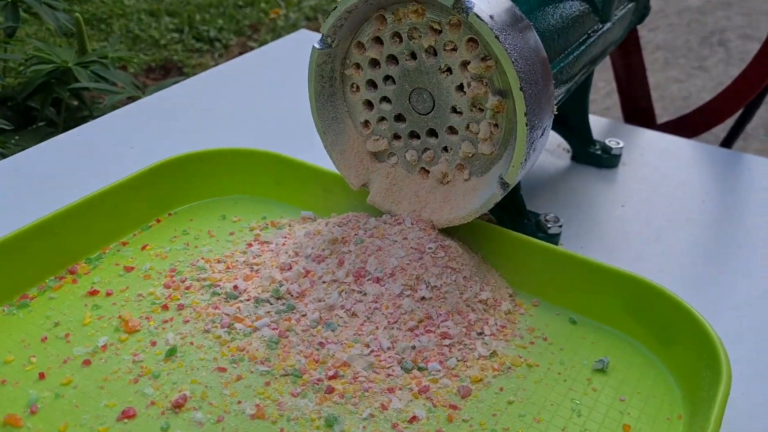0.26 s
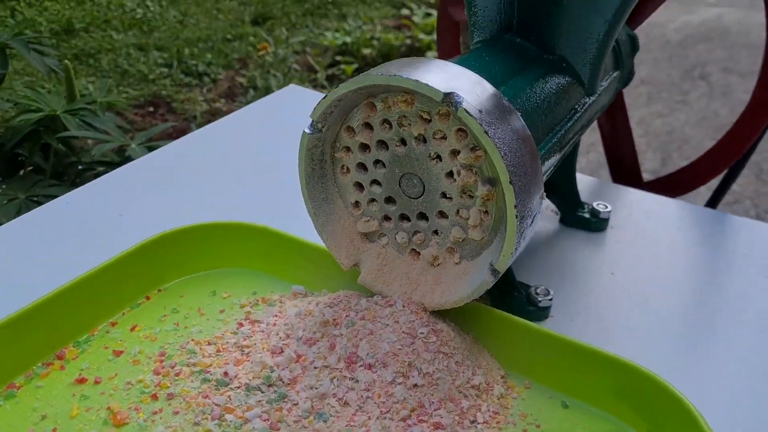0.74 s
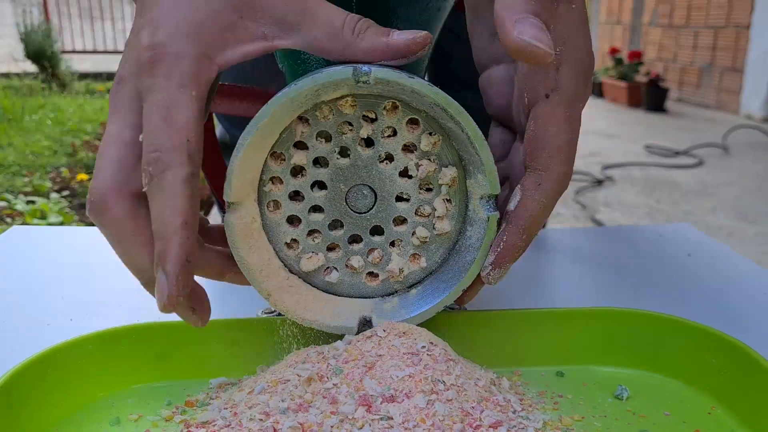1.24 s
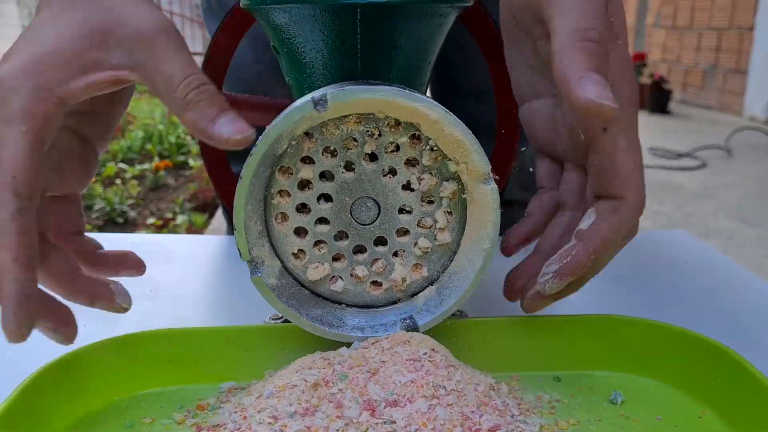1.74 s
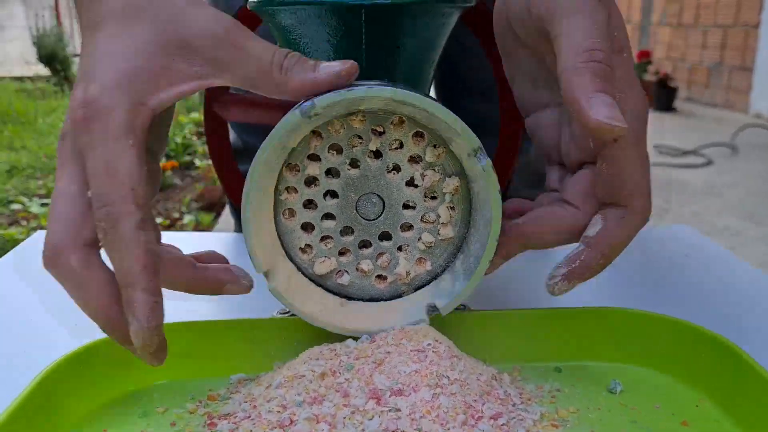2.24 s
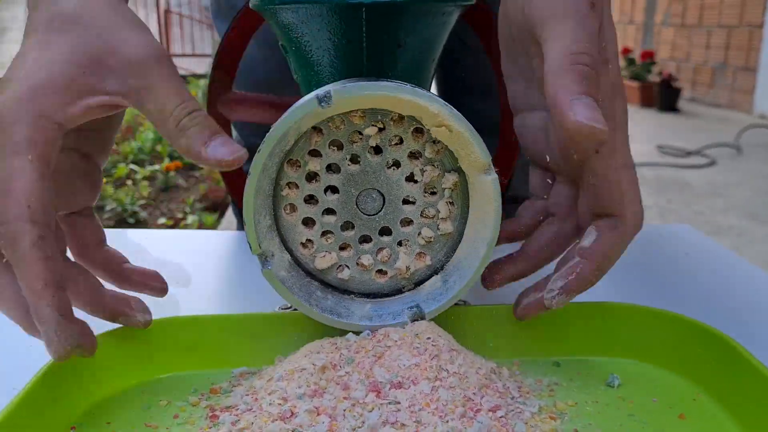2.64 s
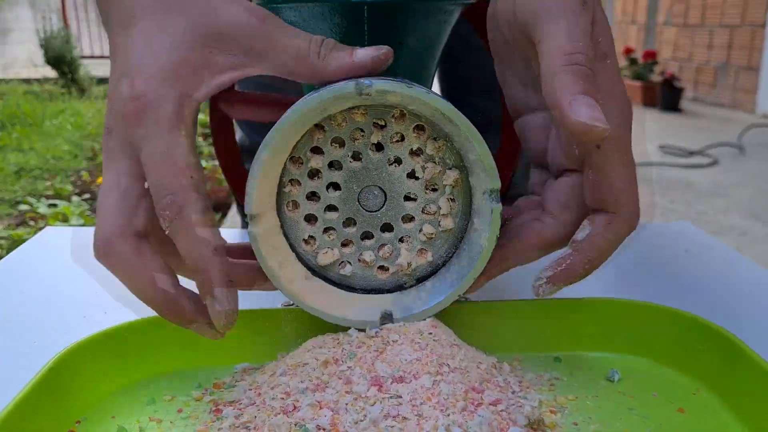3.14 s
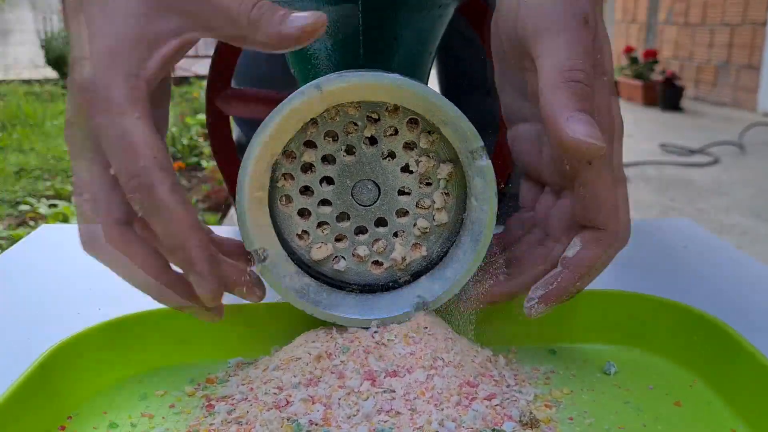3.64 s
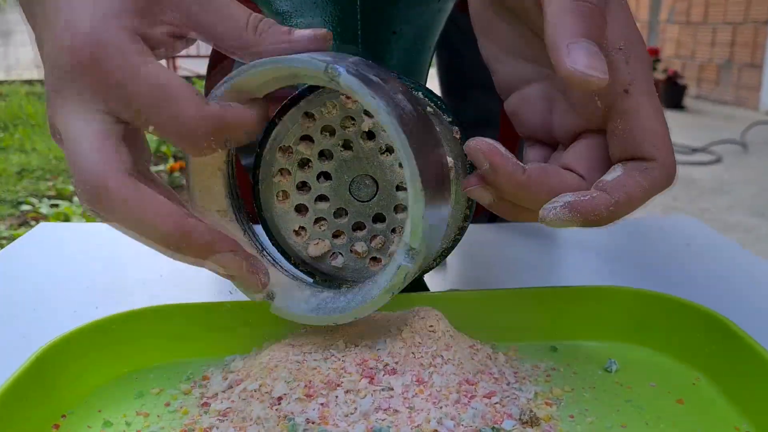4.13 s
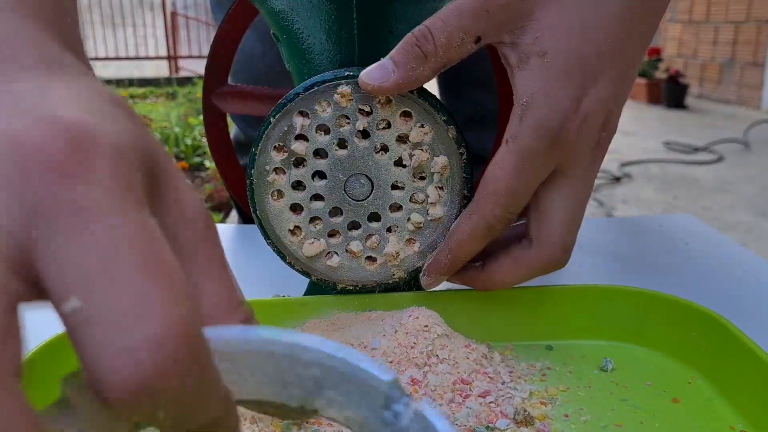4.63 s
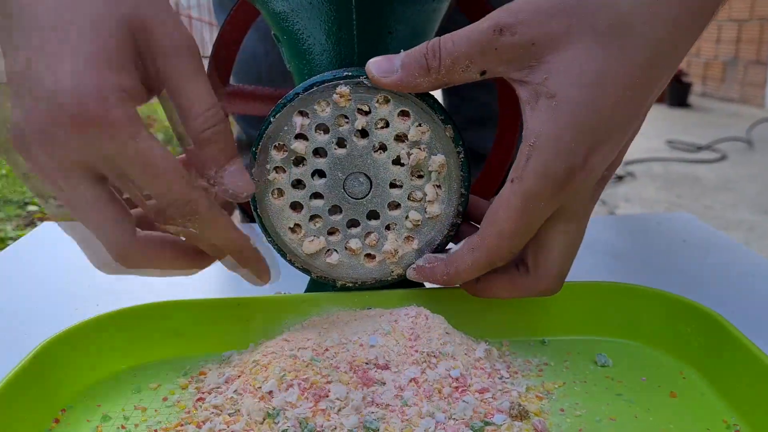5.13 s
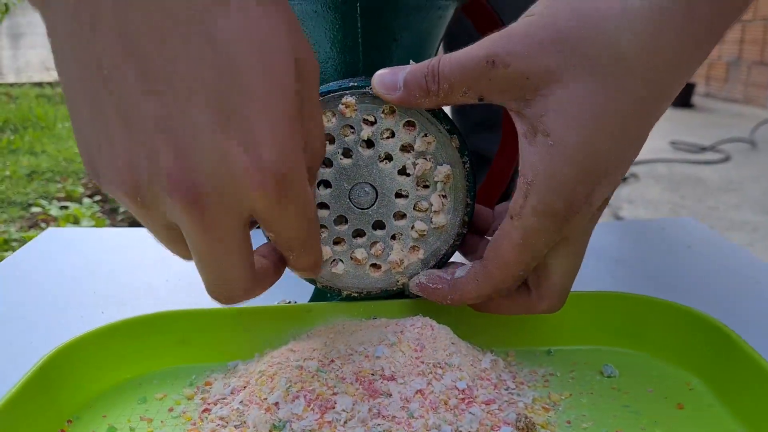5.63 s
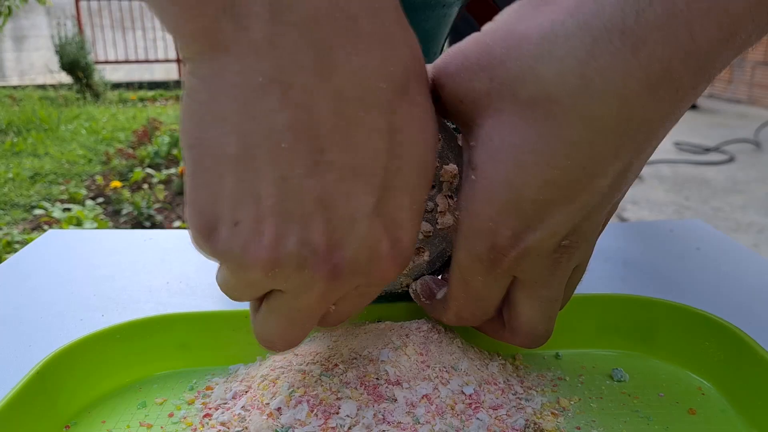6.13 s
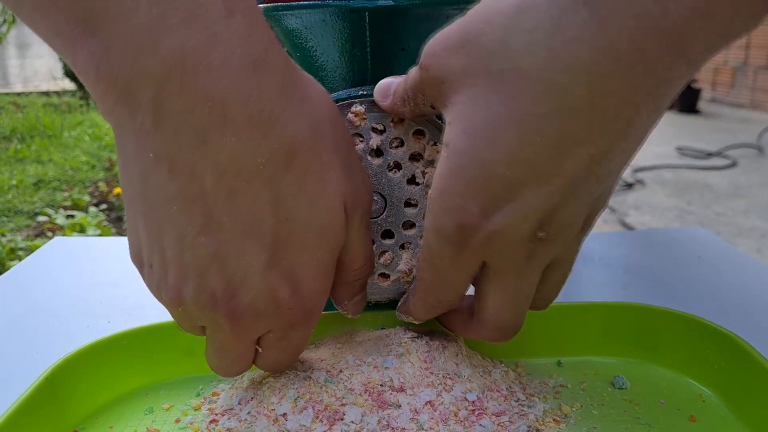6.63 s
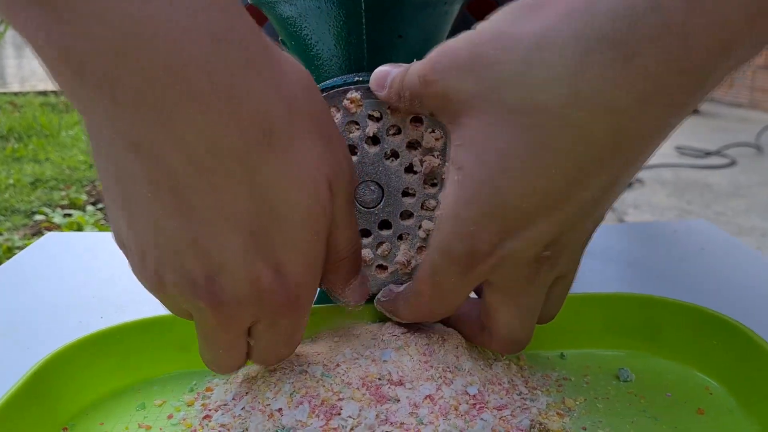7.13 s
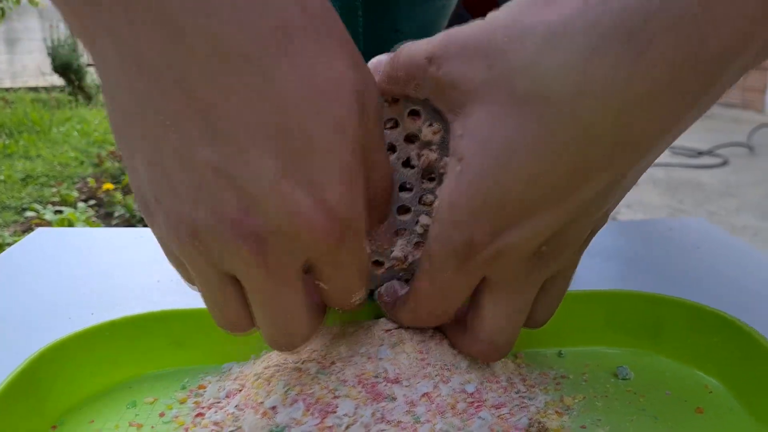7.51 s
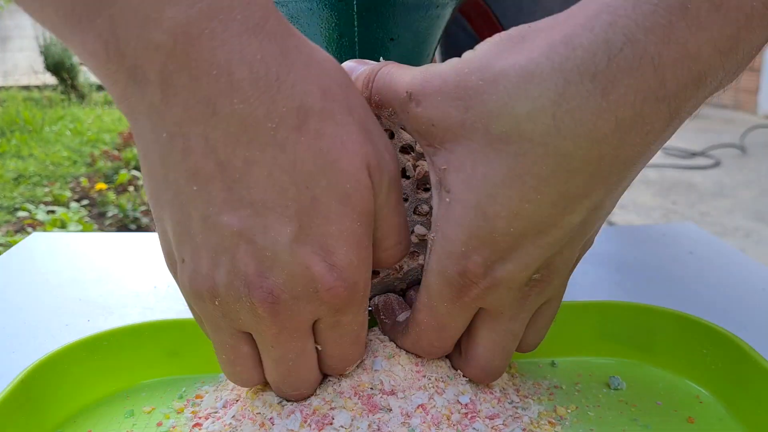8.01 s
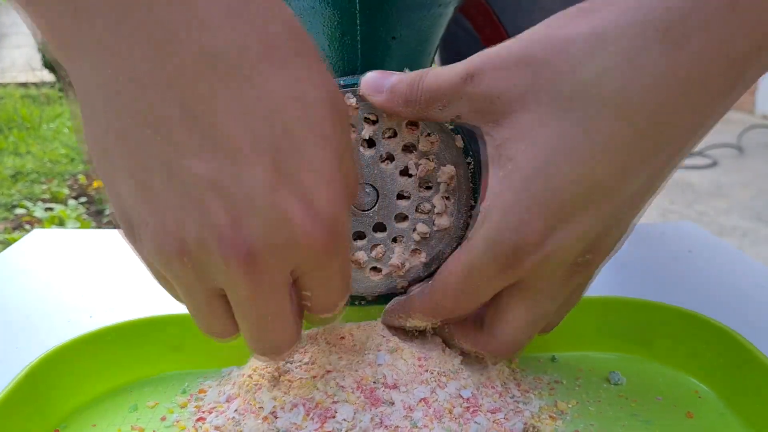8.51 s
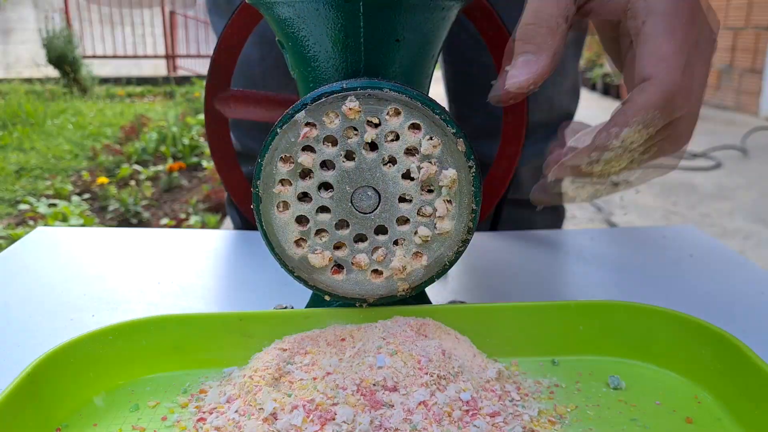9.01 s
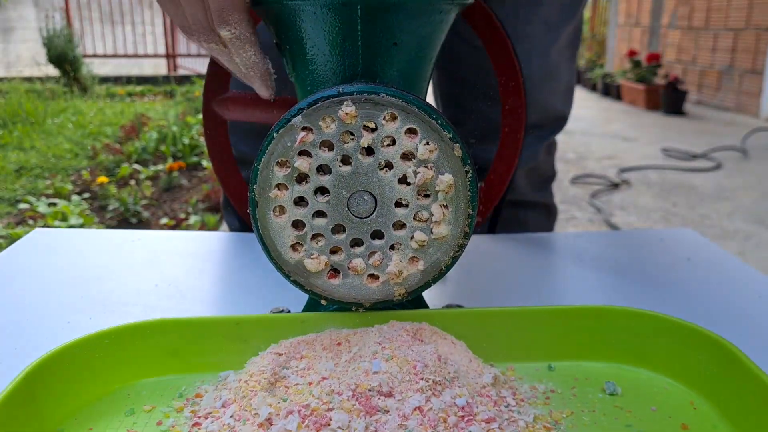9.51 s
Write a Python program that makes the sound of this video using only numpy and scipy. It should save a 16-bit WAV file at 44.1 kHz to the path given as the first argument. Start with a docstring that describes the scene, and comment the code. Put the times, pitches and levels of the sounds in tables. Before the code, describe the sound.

Close stereo microphone in a quiet garden: first dense, gritty crushing with fluttering pulses and low rumble, abruptly stopped. Then about ten loud chattering turns of a loose steel ring, each with knocks, groan and scrape, shaking the table. A clink, a rapid clatter on the tabletop, then soft dull taps, faint rubbing of powder, distant sparrow chirps with short echoes, and low soft air.

```python
"""A meat grinder hums and crunches hard candy: grains of noise in quick surges over low tones and rumble.
After a short silence its locking ring is spun off by hand in a garden: chattering, rasping noise strokes
and knocks of ringing modes. It is put down on the table with a clatter of modes and contact noise.
Fingers then bump the cutting plate (damped modes) and rub candy powder (grains of noise).
A sparrow chirps in fluttering, gliding tones with echoes, over garden noise and two faint low hoots."""
import sys
import numpy as np
from scipy import signal
from scipy.fft import rfft, irfft, next_fast_len
from scipy.io import wavfile
from scipy.ndimage import uniform_filter1d, map_coordinates

SR = 44100
rng = np.random.default_rng(int(sys.argv[2]) if len(sys.argv) > 2 else 0)


def generate_wav(signal):
    """Clip the signal to [-1, 1] and save it as 16-bit WAV at the path in sys.argv[1]."""
    frames = np.transpose(np.atleast_2d(signal))
    scaled = np.clip(frames, -1, 1) * 32767
    pcm = np.round(scaled).astype(np.int16)
    wavfile.write(sys.argv[1], SR, pcm)


N = 430416
TIME_S = np.arange(N) / SR
LIFE_S = TIME_S[:SR * 3 // 4]  # time axis of one struck sound


def amp(db):
    """Decibels to gain."""
    return 10 ** (np.asarray(db) / 20)


def unit(x):
    """Scale to rms 1."""
    return x / np.sqrt(np.mean(x ** 2) + 1e-20)


def peaked(x):
    """Scale to peak 1."""
    return x / np.abs(x).max()


def along(points, hz):
    """Interpolate (frequency, value) points on a log frequency axis."""
    f, v = np.transpose(points)
    return np.interp(np.log(hz + 1), np.log(f + 1), v)


def random_offset(rate):
    """Random value, nearly constant: a smooth curve read at only rate / SR knots a second."""
    knots = rng.standard_normal(int(N * rate / SR) + 4)
    return map_coordinates(knots, [TIME_S * rate / SR])


def filtered(x, response):
    """Multiply the spectrum of x by a response of frequency."""
    size = next_fast_len(x.shape[-1] + SR // 4, True)
    spectrum = rfft(x, size) * response(np.fft.rfftfreq(size, 1 / SR))
    return irfft(spectrum, size)[..., :x.shape[-1]]


def colour(points):
    """Response of a (frequency, level) spectrum."""
    return lambda hz: amp(along(points, hz))


def body(peaks):
    """Response of a set of resonances of alternating polarity."""
    def response(hz):
        total = 0
        for k, (centre, width, db) in enumerate(peaks):
            damping = 1j * hz * width
            total = total + (-1) ** k * amp(db) * damping / (centre * centre - hz * hz + damping)
        return total
    return response


# left-right correlation: (frequency [Hz], correlation [-1 to 1])
CORRELATION = [(60, .93), (300, 0.92), (640, 0.91), (1300, 0.16), (3000, -0.15), (12000, -0.16)]


def spread(pair, response):
    """Two unrelated signals to coloured stereo of rms 1: alike in the bass, apart in the treble."""
    def split(hz):
        turn = np.arccos(np.clip(along(CORRELATION, hz), -1, 1)) / 2
        return response(hz) * np.array([np.cos(turn), np.sin(turn)])
    mid, side = filtered(pair, split)
    return unit(np.array([mid + side, mid - side]))


def noise(size=N):
    """Two white noises."""
    return rng.standard_normal((2, size))


def grains(rate_hz, scatter):
    """Tiny fractures at random moments with log-normal sizes."""
    struck = rng.random(N) < rate_hz / SR
    sizes = np.exp(scatter * np.clip(rng.standard_normal(N), -2, 2))
    return unit(noise() * struck * sizes)


def patchy(depth_db):
    """Noise whose narrow bands swell and fade on their own."""
    z = signal.stft(noise(), nperseg=1024)[2]
    field = uniform_filter1d(rng.standard_normal(z.shape[1:]), size=3, axis=0)
    field = uniform_filter1d(field, size=16, axis=1)
    return signal.istft(z * amp(depth_db * unit(field)), nperseg=1024)[1][:, :N]


def catches(rate_hz, t60_s):
    """Stick and slip: sudden jolts of random size that die quickly."""
    jolts = (rng.random(N) < rate_hz / SR) * rng.uniform(.4, 1, N)
    return unit(signal.lfilter([1], [1, -amp(-60 / (t60_s * SR))], jolts))


STROKE_ATTACK_S = 0.018  # time to gain 20 dB


def strokes(rows, arch_db, fall_db_per_s):
    """Gain of (start, length, level) strokes: fast attack, arch about mid-stroke, steady release."""
    gain = np.zeros(N)
    for s, length, db in rows:
        off_centre = np.clip(2 * (TIME_S - s) / length - 1, -1, 1)
        early = np.maximum(s - TIME_S, 0)
        late = np.maximum(TIME_S - s - length, 0)
        shape_db = -arch_db * off_centre ** 2 - 20 * early / STROKE_ATTACK_S - fall_db_per_s * late
        gain = np.maximum(gain, amp(db + np.maximum(shape_db, -120)))
    return gain


def pan(left_minus_right_db):
    """Gains of the two channels."""
    return amp([[left_minus_right_db / 2], [-left_minus_right_db / 2]])


def rise(attack_s):
    """Build-up of a contact: slow for soft things, quick for hard ones."""
    return 1 - np.exp(-LIFE_S / attack_s)


def dying(decays):
    """Noise in which each frequency dies at its own speed."""
    hz, t, z = signal.stft(noise(len(LIFE_S)), SR, nperseg=256)
    decay = amp(-60 * t / along(decays, hz)[:, None])
    return signal.istft(z * decay, SR, nperseg=256)[1][:, :len(LIFE_S)]


def ringing(modes, treble_db=0, attack_s=0.00016):
    """Decaying modes struck at random strengths; high ones differ in phase between the channels."""
    out = 0
    for hz, db, t60_s in modes:
        high = np.clip(np.log2(hz / 800) / 2, 0, 1)  # 0 below 800 Hz, 1 above 3200 Hz
        phase = 2 * np.pi * (hz * LIFE_S + rng.random() + high * rng.random((2, 1)) / 2)
        level_db = db + high * treble_db + 2 * rng.standard_normal()
        out = out + amp(level_db - 60 * LIFE_S / t60_s) * np.sin(phase)
    return peaked(out * rise(attack_s))


def burst(response, t60_s):
    """Decaying noise through a response."""
    return peaked(spread(noise(len(LIFE_S)) * amp(-60 * LIFE_S / t60_s), response))


def crack(spectrum, t60_s):
    """Short burst of contact noise."""
    return burst(colour(spectrum), t60_s)


def add(track, s, sound):
    """Mix a sound in at time s."""
    part = track[..., round(s * SR):][..., :sound.shape[-1]]
    part += sound[..., :part.shape[-1]]


# crushed candy: (frequency [Hz], density [dB per Hz])
CRUNCH = [(82, -41), (140, -27), (192, -7.5), (230, 2), (369, -9.5), (605, -5), (934, -23.5), (1160, -4),
          (1390, -12.5), (2940, -15.5), (4640, -22.5), (6490, -20.5), (7910, -28), (14000, -32),
          (15800, -42)]
# grinder body resonances: (frequency [Hz], width [Hz], level [dB])
CASTING = [(245, 40, -3), (653, 210, 10), (1155, 27, 7.5), (1593, 30, 9.5), (2540, 54, -8.5),
           (2680, 79, 1.5)]
# drive tones: (frequency [Hz], level [dB])
HUM = [(50.5, -60), (101, -44)]
SURGE_HZ, FIRST_SURGE_S = 13.7, .058  # rate, nominal first crest
GRIND_DB, SURGE_DB, LOAD_DB = -38.5, 2.5, 1.3  # crushing level, surge swing (+/-), scale of random load


def grinding():
    """The screw crushes candy in quick surges over the hum and rumble of its drive."""
    surge = np.cos(2 * np.pi * SURGE_HZ * (TIME_S - FIRST_SURGE_S) + .3 * random_offset(4))
    crush = grains(rate_hz=5000, scatter=0.35) + amp(-3) * unit(patchy(depth_db=3))
    crunch = spread(crush * amp(SURGE_DB * surge + .8 * random_offset(40)), colour(CRUNCH))
    casting = spread(noise() * amp(1.1 * surge), body(CASTING))
    hum = sum(amp(db + 3) * np.sin(2 * np.pi * hz * TIME_S + .12 * random_offset(6)) for hz, db in HUM)
    rumble = spread(noise(), colour([(25, -8), (80, -2), (150, -0.5), (400, -41), (2000, -102)]))
    load = amp(GRIND_DB + LOAD_DB * random_offset(12))
    return (load * (crunch + amp(-4.5) * casting) + hum + amp(-53) * rumble) * pan(-1.4)


# scraping balance: (frequency [Hz], left minus right [dB])
SCRAPE_BALANCE = [(600, 0), (1300, -4), (2500, -1.5), (5000, -6), (7000, -2), (9000, 3), (14000, 2)]


def off_axis(x):
    """The steel radiates each band more to one side."""
    return filtered(x, lambda hz: amp(along(SCRAPE_BALANCE, hz) * np.array([[.5], [-.5]])))


# hands push the ring round:
# (time [s], length [s], chatter level [dB], rasp level [dB], table sway level [dB])
PUSHES = [(1.034, 0.1, -31, -38, -45.5), (1.241, .22, -24.5, -31.5, -42.5), (1.566, 0.14, -24, -28, -39),
          (1.86, 0.24, -23.5, -30.5, -37), (2.185, .2, -22.5, -29, -34.5), (2.473, 0.16, -25.5, -33.5, -37),
          (2.77, 0.21, -21.5, -28.5, -34.5), (3.097, .265, -22.5, -30.5, -37.5),
          (3.423, 0.24, -20, -29, -29.5), (3.747, 0.051, -34.5, -37.5, -40),
          (3.85, 0.059, -34.5, -51, -26.5)]
# barrel resonances: (frequency [Hz], width [Hz], level [dB])
BARREL = [(450, 45, -2), (496, 43, -1.5), (636.6, 131, 1), (678.4, 155, 1), (866, 280, -14.5)]
# table leg resonances: (frequency [Hz], width [Hz], level [dB])
TABLE_LEGS = [(100, 6, -7.5), (176, 16, -1.5), (213, 27, 4.5), (291, 130, -3.5)]
# resonances of the ring on the thread: (frequency [Hz], width [Hz], level [dB])
THREAD = [(1150, 54, -12), (1400, 25, -5), (1730, 48, -1), (2360, 140, -8), (2920, 37, -11),
          (3608, 100, -4.5), (3990, 450, -9), (4880, 75, -13.5), (5470, 82, -9.5), (6190, 86, -4),
          (8730, 67, -19), (10550, 99, -14.5), (11300, 42, -13.5), (11600, 70, -15), (14150, 140, -20),
          (15250, 150, -20.5)]
# rasp on the thread: (frequency [Hz], density [dB per Hz])
RASP = [(530, -30.5), (900, -6), (1540, -1.5), (1700, -1.5), (3290, -13), (3750, -11), (5180, -20),
        (6200, -15.5), (7700, -25), (10600, -24), (13000, -27.5), (14200, -29), (15800, -30.5)]
CHATTER_ARCH_DB, RASP_ARCH_DB = 3, 10.5  # loss at the ends of a push
CHATTER_FALL_DB_PER_S, RASP_FALL_DB_PER_S = 167.5, 229.5
CHATTER_HZ, CHATTER_RISE_HZ, CHATTER_OFFSET_HZ = 540, 55, 48  # base, rise at full speed, random offset scale
CHATTER_SAG_HZ_PER_S = 250  # pitch fall since the push began


def unscrewing():
    """Pushes drag the ring over a sugary thread: barrel chatter, a groan higher when faster, rasp above."""
    s, length, chatter_db, rasp_db, _ = np.transpose(PUSHES)
    body_gain = strokes(zip(s, length, chatter_db), CHATTER_ARCH_DB, CHATTER_FALL_DB_PER_S)
    rasp_gain = strokes(zip(s, length, rasp_db), RASP_ARCH_DB, RASP_FALL_DB_PER_S)
    speed = peaked(rasp_gain)
    chatter = unit(amp(2 * random_offset(70)) + .7 * catches(rate_hz=70, t60_s=.035))
    barrel = spread(grains(rate_hz=1200, scatter=0.35) * chatter, body(BARREL))

    since_push_s = TIME_S - s[np.maximum(np.searchsorted(s, TIME_S) - 1, 0)]
    pitch_hz = CHATTER_HZ + CHATTER_RISE_HZ * speed - CHATTER_SAG_HZ_PER_S * since_push_s
    pitch_hz = pitch_hz + CHATTER_OFFSET_HZ * random_offset(22)
    phase = 2 * np.pi * np.cumsum(pitch_hz) / SR
    tone = random_offset(120) * np.cos(phase) + random_offset(120) * np.sin(phase)
    groan = unit(tone * amp(3 * random_offset(22)))

    legs = spread(noise() * chatter, body(TABLE_LEGS))
    metal = spread(grains(rate_hz=2000, scatter=.25) * chatter, body(THREAD))
    grit = grains(rate_hz=2500, scatter=0.14) * chatter
    casting_tail = dying([(1000, 0.054), (12000, 0.1)])  # dense short-lived modes
    rasp = spread(signal.fftconvolve(grit, casting_tail, axes=1)[:, :N], colour(RASP))
    shifting = spread(patchy(depth_db=7.0) * chatter, colour(RASP))  # moving contact, ever new bands
    upper = amp(-1.0) * metal + amp(1.5) * rasp + amp(-1.5) * shifting
    lower = amp(-2.5) * barrel + amp(-6.0) * groan + amp(-10) * legs
    return body_gain * lower + off_axis(rasp_gain * upper + rattling(metal, grit))


# table rocks as the ring is lifted off and as it lands: (time [s], length [s], level [dB])
ROCKS = [(4.145, .34, -37.5), (4.66, .22, -26.5)]
# working hands keep the table swaying: (time [s], length [s], level [dB])
STEADYING = (1.053, 4.0, -42)
# hands lean on the machine: (time [s], length [s], level [dB])
LEANS = [(5.63, 0.097, -53.5), (6.3, 0.16, -58.5), (6.81, .1, -45.5), (7.15, 0.54, -53), (7.58, 0.035, -42),
         (8.0, 0.18, -56), (8.45, 0.61, -47), (9.1, 0.62, -51)]
SWAY_FALL_DB_PER_S = 129.5


def table():
    """The table sways and drones on its legs under each push, the landing ring and the leaning hands."""
    s, length, _, _, sway_db = np.transpose(PUSHES)
    shake = strokes(zip(s, length, sway_db), arch_db=-1.5, fall_db_per_s=SWAY_FALL_DB_PER_S)
    rocking = strokes(list(ROCKS) + [STEADYING], arch_db=2, fall_db_per_s=180)
    sway = spread(noise(), body([(61.7, 19, -3), (30, 8.3, -18)]))
    drone = spread(noise(), body(TABLE_LEGS))
    shaking = np.maximum(shake, rocking) * sway + (amp(-7) * shake + amp(-10.0) * rocking) * drone
    shaking = filtered(shaking, colour([(700, -0.5), (2000, -11.5), (8000, -45)]))
    leaning = spread(noise(), colour([(25, -5), (60, 5.5), (130, -8.0), (300, -13.5), (600, -17.5),
                                      (1500, -30.5), (6000, -85)]))
    return shaking + amp(-4.5) * strokes(LEANS, arch_db=0.5, fall_db_per_s=100) * leaning


# garden background: (frequency [Hz], density [dB per Hz])
GARDEN = [(22, 0), (61, -0.5), (130, -18), (216, -14), (420, -17.5), (800, -30), (1400, -26), (2400, -29),
          (3700, -31), (6500, -44.5), (12000, -63.5), (15800, -78)]
GARDEN_DB = -55.5


def garden_air():
    """Garden background: noise whose narrow bands swell and fade, at a slightly random level."""
    level = amp(GARDEN_DB + 1.9 * random_offset(3))
    return level * spread(patchy(depth_db=6.5), colour(GARDEN)) * pan(-1.5)


# diffuse tail of the yard: (frequency [Hz], t60 [s])
YARD = [(200, 0.37), (1500, 0.36), (3500, 0.42), (6000, 0.18), (14000, 0.092)]


def yard(x):
    """Walls and paving answer with a short diffuse tail."""
    tail = unit(dying(YARD)) / np.sqrt(len(LIFE_S))
    return signal.fftconvolve(np.atleast_2d(x), tail, axes=1)[:, :N]


# ring knocks on the thread: (time [s], level [dB], treble level [dB])
KNOCKS = [(1.052, -35.5, -12.5), (1.241, -11, -57), (1.654, -10, -23.5), (1.859, -11, -17),
          (2.046, -11.5, -30), (2.148, -14, -21), (2.213, -10, -24), (2.302, -8.5, -16), (2.476, -9, -43),
          (2.717, -12, -49.5), (2.767, -7.5, -28.5), (2.904, -9.5, -8.5), (3.074, -10, -60),
          (3.194, -12.5, -23), (3.228, -9.5, -23), (3.418, -2.5, -26.5), (3.495, -12.5, -13.5),
          (3.569, -17.5, -18.5), (3.586, -7, -21.5), (3.846, -5, -19), (3.882, -5, -16.5), (3.924, -18, -6)]
# ring modes: (frequency [Hz], level [dB], t60 [s])
RING = [(506, 8.5, 0.026), (597, -2.5, 0.037), (627, 0.5, 0.058), (675, -7.5, .08), (954.6, -6.5, 0.12),
        (1274, -1.5, 0.045), (1390, -11, 0.15), (1673, -4, 0.065), (1840, -13.5, 0.13), (2360, -7, 0.062),
        (3810, -15, 0.1), (5490, -24, .08), (6460, -31, 0.13), (10380, -38.5, 0.15), (11060, -45.5, .08)]
# table top: (frequency [Hz], density [dB per Hz])
TOP = [(180, -44.5), (300, -5), (519, -7.5), (711, 9.5), (882, 1), (990, 7.5), (1360, 3), (1500, -8.5),
       (2420, -8.5), (5200, -38.5), (6240, -36), (6780, -45), (15800, -50.5)]
# steel hitting the top: (frequency [Hz], density [dB per Hz])
STEEL = [(500, -13), (1400, 2.5), (2400, 3), (4000, -6), (6200, -11.5), (8000, -20.5), (15800, -27)]


def knocks():
    """The loose ring drops against the thread: a hard chip of sound, then ring and barrel resound."""
    out = np.zeros((2, N))
    for s, db, treble_db in KNOCKS:
        barrel = burst(body(BARREL), t60_s=0.14)
        chip = amp(treble_db + 8.5) * crack(RASP, t60_s=0.019)
        chip = chip + amp(-6.5) * crack(TOP, t60_s=0.019) + amp(-20.5) * crack(STEEL, t60_s=0.0056)
        ring = ringing(RING, .5 * (treble_db + 10.5))
        add(out, s, amp(db) * (ring + amp(-7.5) * barrel + chip * pan(-3.5)))
    return out


# sparrow syllables: (time from start [s], pitch [Hz], level [dB])
CHIRP = [(0, 3270, -14.5), (.012, 5800, -9), (.03, 5183, -9), (.05, 4712, 0.5), (.062, 3116, -16.5),
         (.076, 3568, -1), (.092, 4242, -5.5), (.12, 2792, -17), (.14, 5220, -16.5), (.165, 4600, -21.5)]
CHEEP = [(0, 3302, -6.5), (.011, 4770, 0), (.045, 3432, -0.5), (.06, 2867, -4), (.08, 3730, 3),
         (.113, 2503, -1.5), (.119, 4135, -26.5), (.126, 5000, -10.5), (.138, 4554, -31)]
CHUP = [(0, 3384, -5.5), (.025, 3725, -3), (.055, 3280, -12), (.075, 2900, 1.5), (.108, 2370, -6.5)]
# when each syllable is sung: (time [s], level [dB])
CHIRPS = [(1.72, -36.5), (2.41, -53), (3.36, -38), (5.512, -51.5), (5.843, -40.5), (7.008, -50.5),
          (7.217, -39), (8.3, -53), (8.548, -39.5), (9.675, -56.5)]
CHEEPS = [(2.57, -51), (3.893, -45.5), (5.255, -51), (6.552, -46.5), (7.784, -44.5), (9.185, -44.5)]
CHUPS = [(1.47, -48.5), (6.445, -51), (7.584, -53), (8.888, -55)]


def sparrow():
    """Gliding syllables, buzzing with a fast flutter of pitch, with a weak octave."""
    song = np.zeros(N)
    for syllable, calls in ((CHIRP, CHIRPS), (CHEEP, CHEEPS), (CHUP, CHUPS)):
        knots_s, hz, shape_db = np.transpose(syllable)
        t = TIME_S[TIME_S < knots_s[-1]]
        for s, db in calls:
            hoarse = unit(uniform_filter1d(rng.standard_normal(len(LIFE_S)), size=90))[:len(t)]
            flutter = 0.034 * np.sin(2 * np.pi * 300 * t) + 0.024 * hoarse
            phase = 2 * np.pi * np.cumsum(np.interp(t, knots_s, hz) * (1 + flutter)) / SR
            voice = np.sin(phase) + amp(-27.5) * np.sin(2 * phase)
            add(song, s, amp(db + np.interp(t, knots_s, shape_db)) * voice)
    return song


# birdsong echoes: (delay [s], level [dB])
WALLS = [(.021, -23.5), (0.04, -41), (.066, -19), (0.108, -18)]


def from_afar(song):
    """A distant call arrives directly, off nearby walls and as a diffuse tail."""
    direct = np.array([song, np.roll(song, shift=3)])
    echoes = np.zeros((2, N))
    for delay_s, db in WALLS:
        for channel in echoes:
            add(channel, delay_s + 0.0012 * rng.random(), amp(db) * song)
    arrival = amp(-3) * direct + echoes + yard(song)
    return amp(1.5) * arrival * pan(-3.5)


# ring comes free and clips the barrel: (time [s], level [dB])
CLINK = (4.142, -7.5)
# free ring modes: (frequency [Hz], level [dB], t60 [s])
FREE_RING = [(205.6, -5.5, .2), (443, -11, 0.25), (493.2, 3, 0.063), (641, 2.5, .08), (715, -9.5, 0.072),
             (930, -8, 0.098), (996, -18, 0.17), (1390, -27.5, 0.5), (1660, -22, .1), (2000, -18, .3),
             (3640, -13, 0.078), (5370, -21.5, 0.075), (6060, -13.5, 0.085), (11060, -36, 0.06),
             (14140, -29, 0.052)]


def clink():
    """Off the thread, the ring is free to sing on; the barrel answers with a dull knock."""
    out = np.zeros((2, N))
    s, db = CLINK
    knock = crack([(100, -5.5), (200, 4), (700, -2), (1100, -11), (2500, -27), (8000, -59)], t60_s=0.34)
    scrape = crack(RASP, t60_s=.025)
    add(out, s, amp(db) * (ringing(FREE_RING) + amp(-15.0) * scrape + amp(-13) * knock))
    return out


# light touches of nails and crumbs on steel: (time [s], level [dB])
TICKS = [(4.29, -42), (4.415, -68), (4.434, -63.5), (5.66, -55.5), (6.2806, -61.5), (6.3924, -60),
         (9.213, -44.5), (9.274, -51), (9.344, -47)]


def ticks():
    """Small scratches hiss briefly through the high resonances of the steel."""
    out = np.zeros((2, N))
    for s, db in TICKS:
        scratch = burst(body(THREAD), t60_s=.13)
        hiss = crack(STEEL, t60_s=.13)
        add(out, s, amp(db) * rise(attack_s=0.0037) * (amp(1.5) * scratch + amp(4.5) * hiss))
    return out


# ring bounces on the table: (time [s], level [dB], thump level [dB], treble level [dB])
CLATTER = [(4.507, -1, -10, -28.5), (4.533, -3, -14, -13), (4.54, -3, -13.5, -15.5),
           (4.55, -5.5, -14.5, -9.5), (4.586, -19, -13.5, -19), (4.651, -3, -4, -29.5),
           (4.662, -3, -15, -11), (4.67, -7, -9.5, -9.5), (4.719, -6.5, -5.5, -26.5),
           (4.731, -7.5, -2.5, -16.5), (4.748, 3, -13, -25.5), (4.769, -4.5, -7, -13.5),
           (4.819, -24, -8, -27.5), (4.839, -10, 3, -23.5), (4.852, 0.5, -12, -20),
           (4.866, -13, 5.5, -18.5), (4.922, -19.5, -18.5, -11), (4.984, -37, 13.5, -22),
           (5.05, -49.5, 18.5, -28.5)]
# table top decay: (frequency [Hz], t60 [s])
TOP_DECAY = [(300, 0.061), (1000, 0.049), (3000, 0.077), (12000, 0.056)]
# table thump modes: (frequency [Hz], level [dB], t60 [s])
THUMP = [(68, -4.5, 0.43), (108, -4, 0.25), (160, -6.5, 0.09), (195, -3, 0.17), (232.2, -0.5, 0.061),
         (297, -2.5, 0.053)]


def clatter():
    """The ring lands and rocks on the table top, which thumps under it."""
    out = np.zeros((2, N))
    for s, db, thump_db, treble_db in CLATTER:
        board = peaked(spread(dying(TOP_DECAY), colour(TOP)))
        steel = amp(-6.5) * ringing(RING, treble_db=10) + amp(4.5) * crack(STEEL, t60_s=0.028)
        thump = amp(thump_db - 2) * ringing(THUMP)
        add(out, s, amp(db) * (amp(-2.5) * board + amp(treble_db + 6.5) * steel + thump))
    return out * pan(-.3)


# ring rattles between bounces: (time [s], length [s], level [dB])
RATTLES = [(4.527, 0.025, -16), (4.575, 0.081, -40.5), (4.654, 0.073, -26), (4.72, .07, -22),
           (4.812, .01, -26.5), (4.84, 0.08, -32.5)]


def rattling(metal, grit):
    """The ring skids on the table: gritty contact excites its steel and the top."""
    skid = amp(-11) * metal + amp(-8) * spread(grit, colour(TOP)) + amp(-12) * spread(grit, colour(STEEL))
    return strokes(RATTLES, arch_db=6, fall_db_per_s=451.5) * skid


# faint far-off hoots: (time [s], length [s], frequency [Hz], level [dB])
FAR_TONES = [(5.396, 0.44, 410, -66.5), (6.425, 0.18, 410, -63.5)]


def far_tones():
    """Soft low hoots from far away: sines that swell and fade."""
    out = np.zeros(N)
    for s, length, hz, db in FAR_TONES:
        t = TIME_S[TIME_S < length]
        add(out, s, amp(db + 4.0) * np.sin(np.pi * t / length) * np.sin(2 * np.pi * hz * t))
    return out


# fingers bump the cutting plate: (time [s], level [dB], tick level [dB])
TAPS = [(5.644, -36, -13.5), (6.813, -27.5, -24), (6.847, -27.5, 0.5), (7.152, -38, -41), (7.191, -42, -35),
        (7.344, -29.5, -39), (7.381, -41.5, -35), (7.529, -34, -23), (7.599, -45, -25), (8.475, -28, -35),
        (8.519, -36.5, -22), (8.622, -33, -30), (8.764, -28, -32), (8.798, -32.5, -14.5),
        (8.881, -34, -23.5), (9.005, -34, -31.5), (9.121, -37.5, -25), (9.203, -39, -22), (9.279, -43, 2),
        (9.342, -40.5, -5), (9.517, -35.5, -27), (9.602, -43.5, -24)]
# plate modes: (frequency [Hz], level [dB], t60 [s])
PLATE = [(191.6, -10, 0.74), (225.7, 0.5, 0.18), (314, -8, 0.23), (455.5, 0.5, 0.13), (539.5, 2.5, 0.11),
         (636, -0.5, 0.089)]
# nail on steel: (frequency [Hz], density [dB per Hz])
NAIL = [(100, 4), (450, -18), (900, -1.5), (1300, -2), (1750, -4.5), (2100, -0.5), (2960, -9), (6350, -28),
        (15800, -60)]


def fingers():
    """Dull bumps on the plate, its modes shifted at random for each, with the tick of a nail or a crumb."""
    out = np.zeros((2, N))
    for s, db, tick_db in TAPS:
        pitch_factor = rng.uniform(.88, 1.12)
        modes = [(hz * pitch_factor, level_db, t60_s) for hz, level_db, t60_s in PLATE]
        bump = ringing(modes, attack_s=0.0025)
        pad = crack([(100, -8), (230, 5), (700, -5.0), (1500, -19.5), (5000, -54.5)], t60_s=0.163)
        nail = amp(tick_db + 5) * crack(NAIL, t60_s=0.085)
        add(out, s, amp(db) * rise(attack_s=.003) * (amp(-6) * bump + amp(-8) * pad + nail))
    return out


# knuckles press into the powder: (time [s], length [s], level [dB])
RUBS = [(7.58, 0.042, -60), (7.705, 0.031, -58.5), (7.93, 0.057, -47.5), (8.02, 0.068, -47),
        (8.122, 0.0574, -42.5), (8.275, 0.024, -55), (8.368, 0.097, -58)]
# creaking powder: (frequency [Hz], density [dB per Hz])
POWDER = [(59, -41.5), (100, -10), (135, 5.5), (356, -13.5), (450, -1), (568, -14), (717, -5.5),
          (1300, 1.5), (1750, -9.5), (2070, 3.5), (2960, -14), (6350, -21.5), (15800, -42)]


def powder():
    """Crushed candy creaks in small slips under the knuckles."""
    slips = grains(rate_hz=1400, scatter=0.171) * amp(3.3 * random_offset(120))
    pressure = strokes(RUBS, arch_db=6.5, fall_db_per_s=499)
    return amp(6.5) * pressure * spread(slips, colour(POWDER)) * pan(-1.1)


# silence between the two scenes: (grinding end [s], dismantling start [s])
CUT = (.979, 1.051)


def scene():
    """The grinding, a moment of silence, then the dismantling in the open air."""
    work = unscrewing() + knocks() + clink() + ticks() + clatter() + fingers() + powder()
    garden = garden_air() + from_afar(sparrow()) + far_tones()
    dismantling = work + amp(-27.5) * yard(work) + table() + garden
    return grinding() * (TIME_S < CUT[0]) + dismantling * (TIME_S > CUT[1])


TOP_HZ = 16100


def record(dry):
    """Clip at full scale, then remove everything from the band limit up."""
    return filtered(np.clip(dry, -1, 1), lambda hz: hz < TOP_HZ)


dry = scene()
out = record(dry)
generate_wav(out)
```